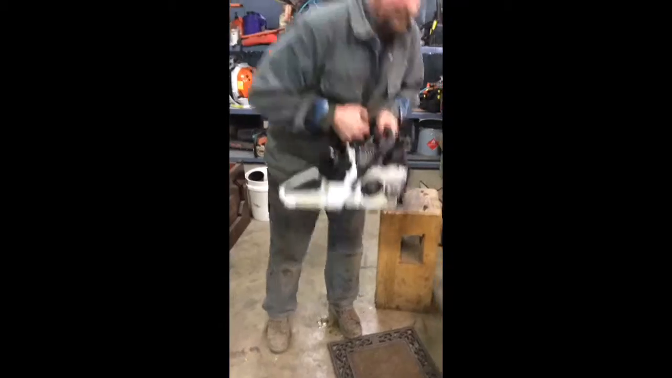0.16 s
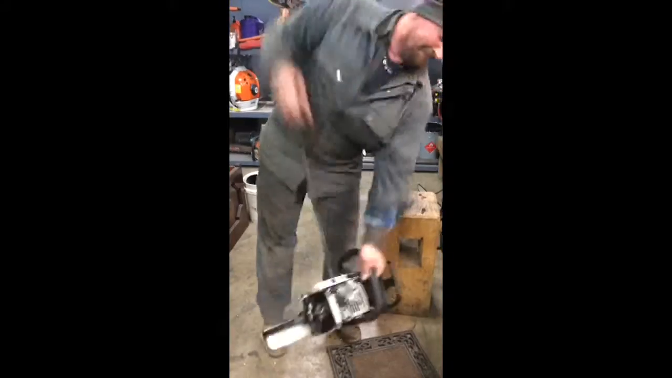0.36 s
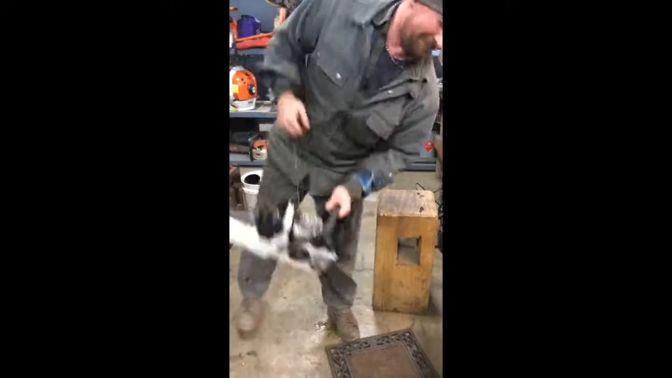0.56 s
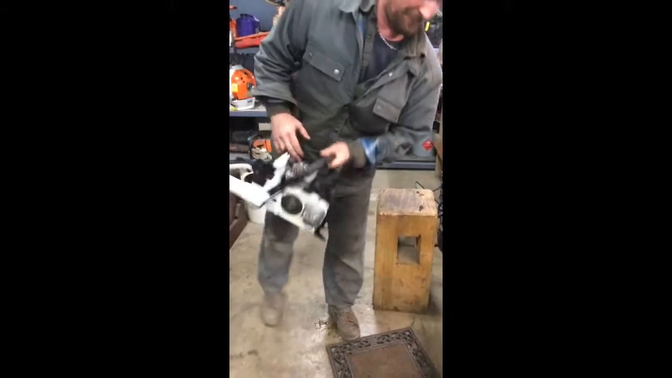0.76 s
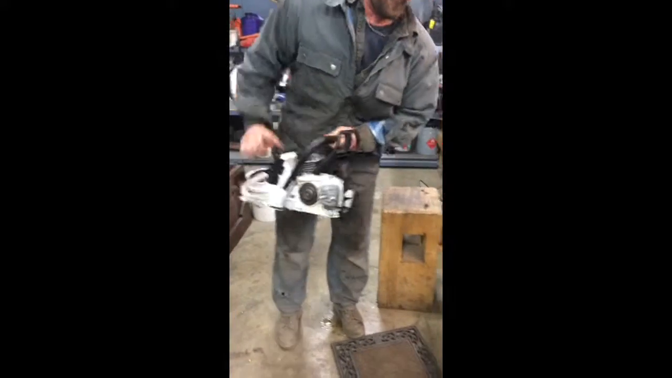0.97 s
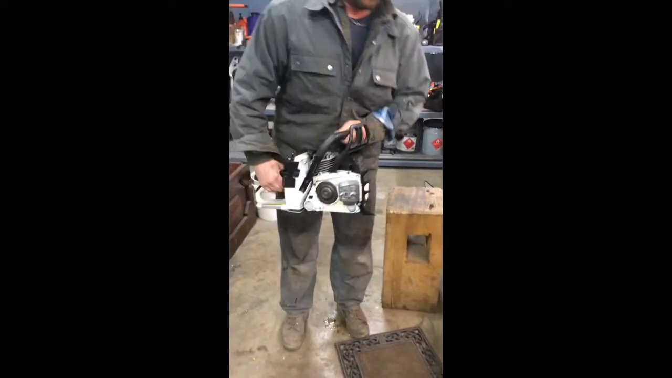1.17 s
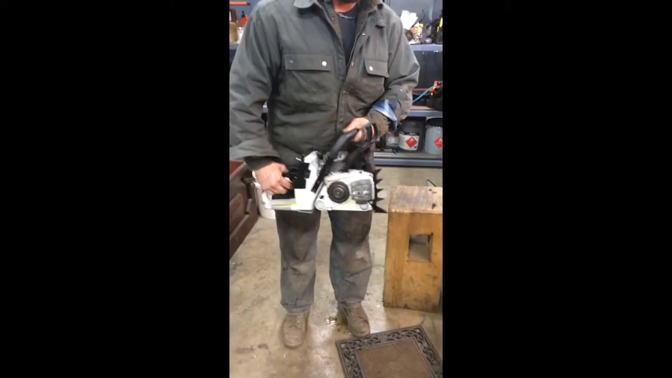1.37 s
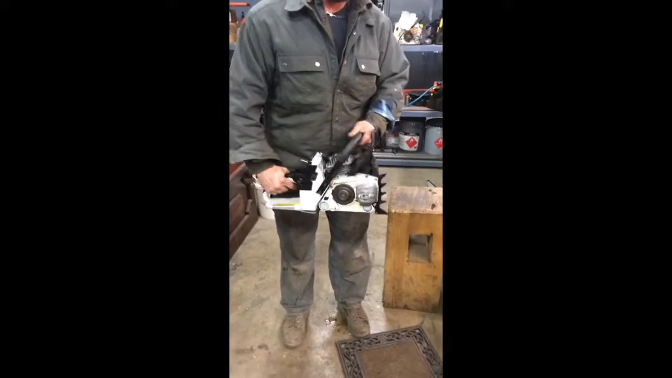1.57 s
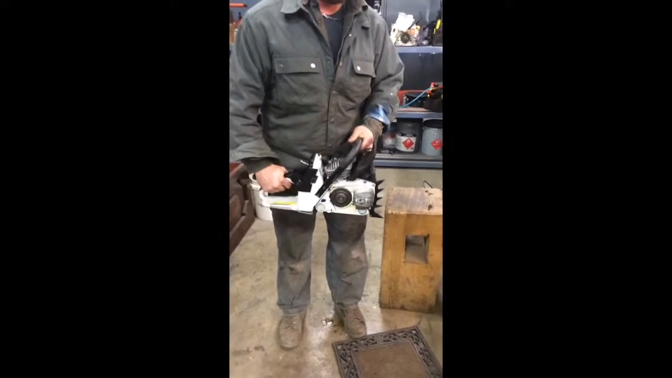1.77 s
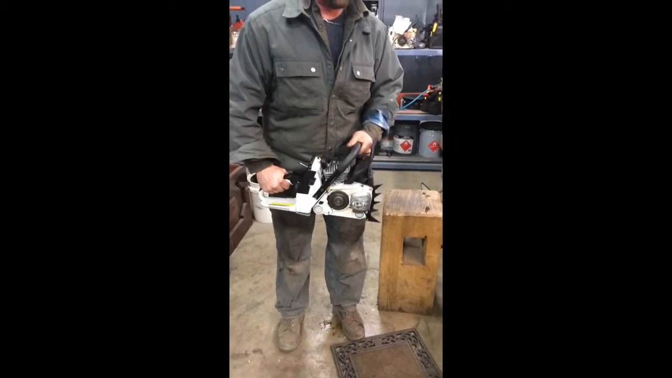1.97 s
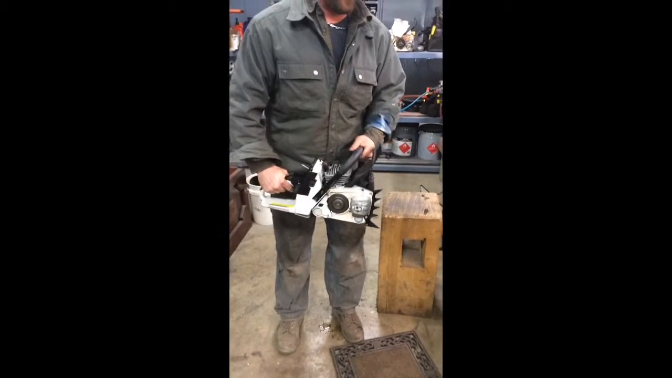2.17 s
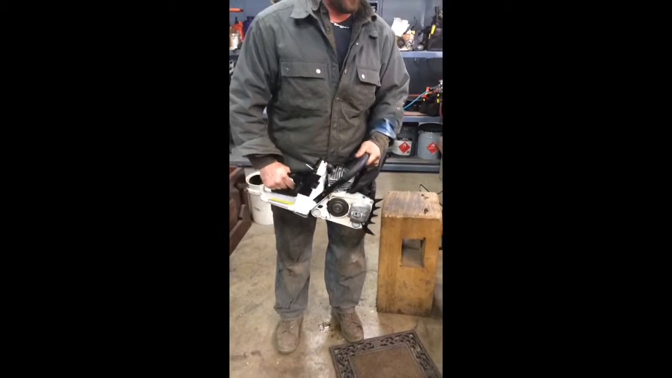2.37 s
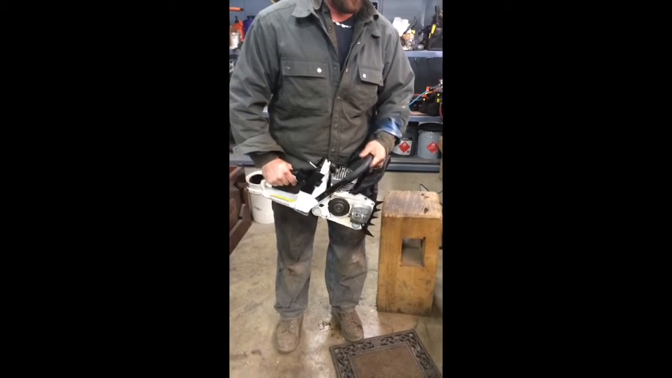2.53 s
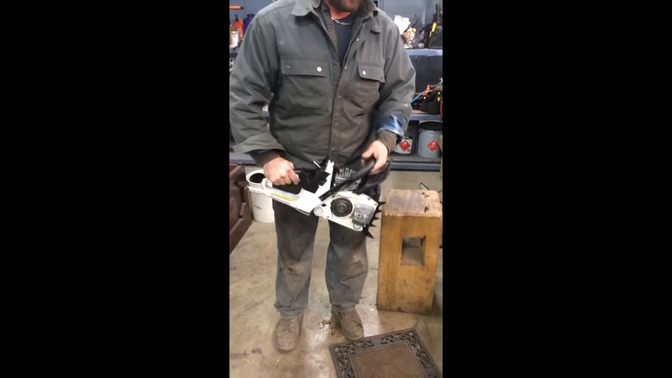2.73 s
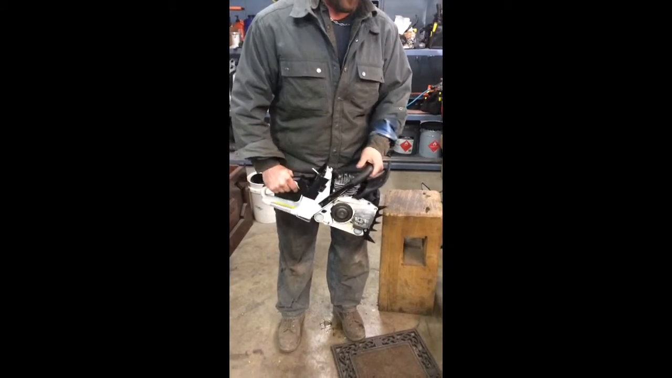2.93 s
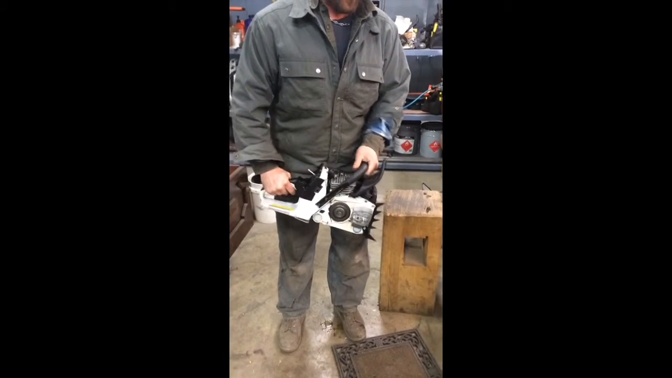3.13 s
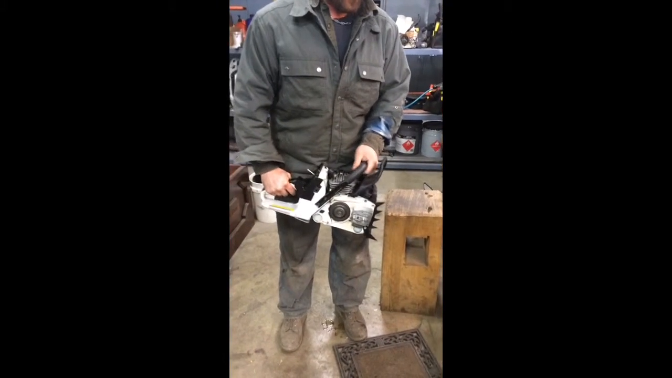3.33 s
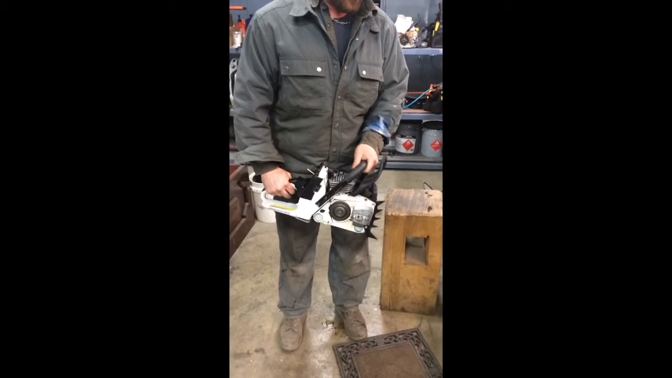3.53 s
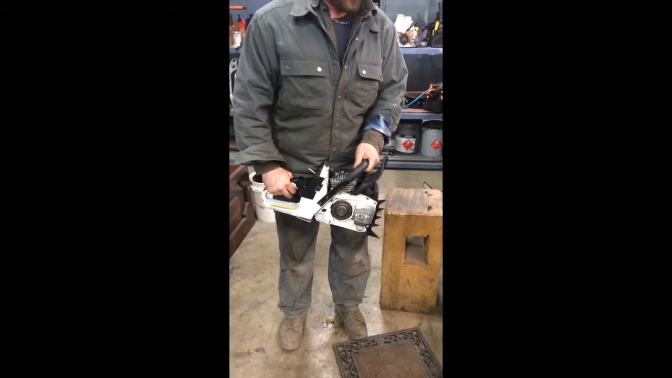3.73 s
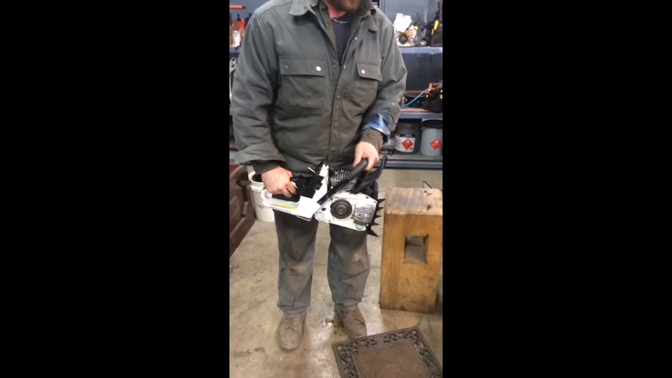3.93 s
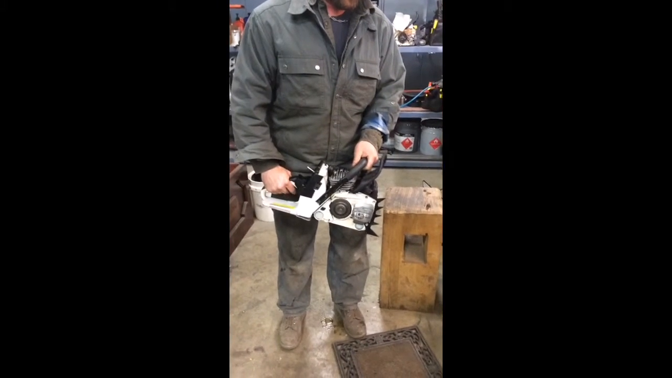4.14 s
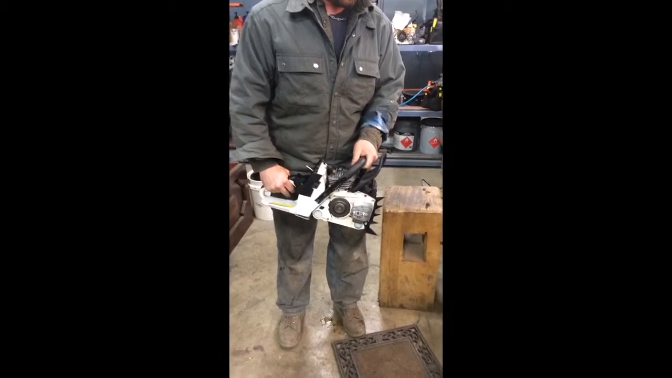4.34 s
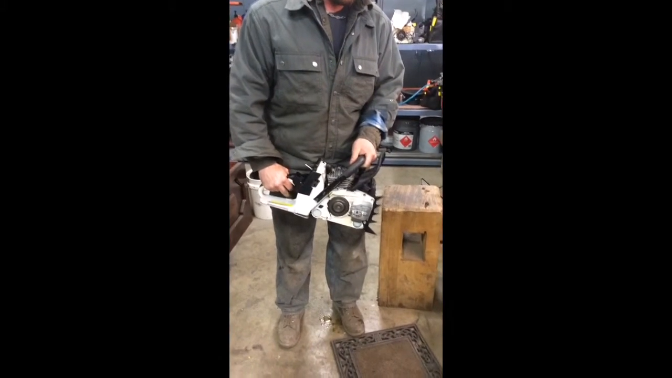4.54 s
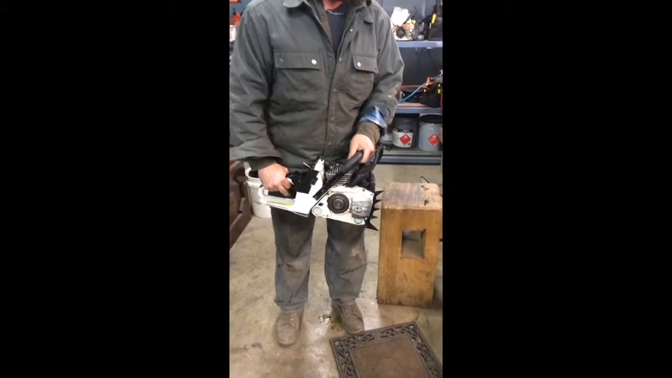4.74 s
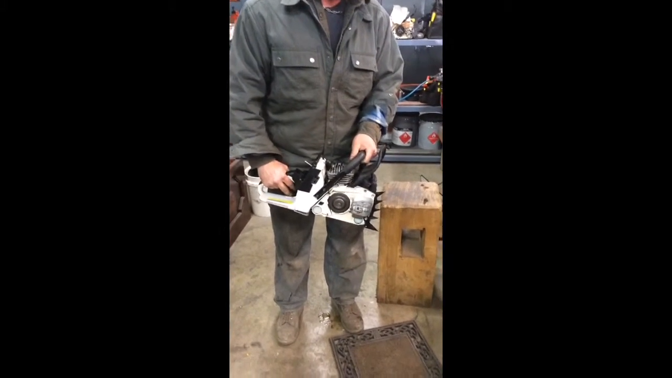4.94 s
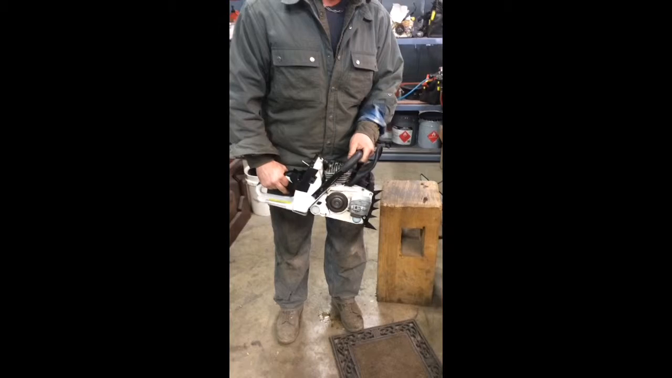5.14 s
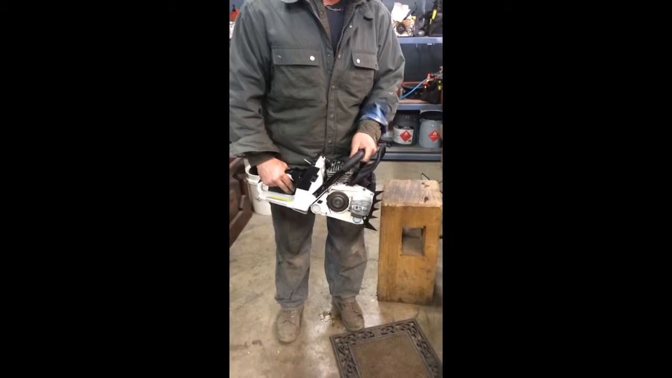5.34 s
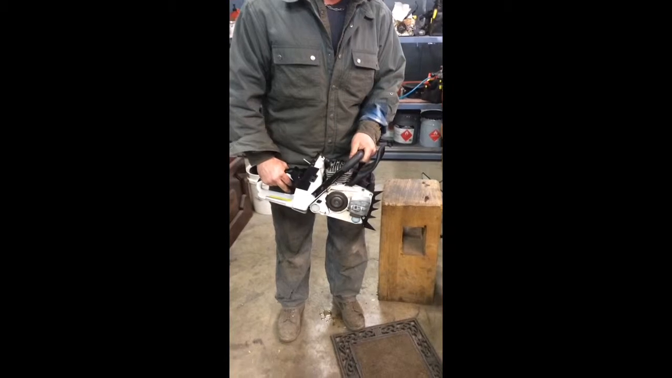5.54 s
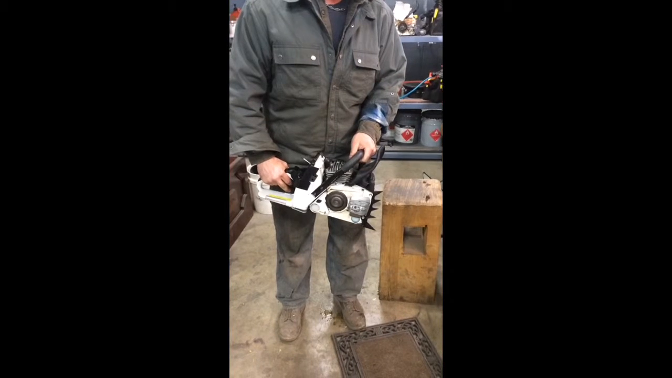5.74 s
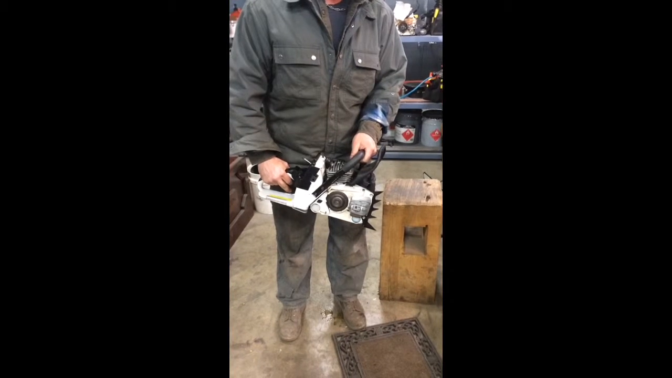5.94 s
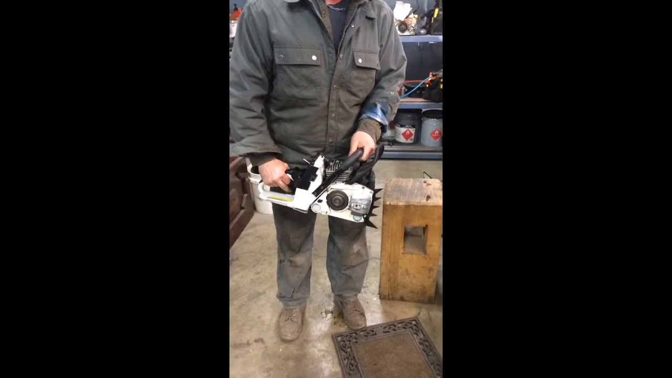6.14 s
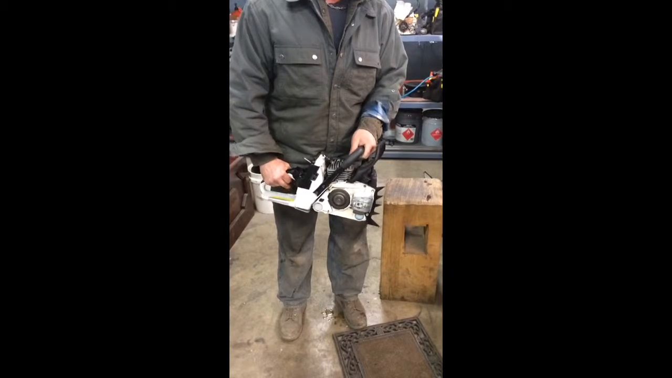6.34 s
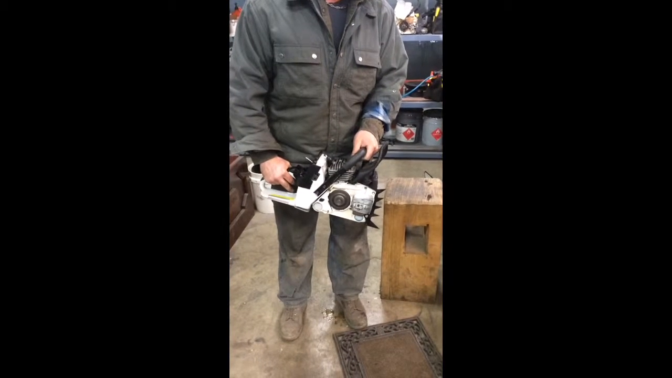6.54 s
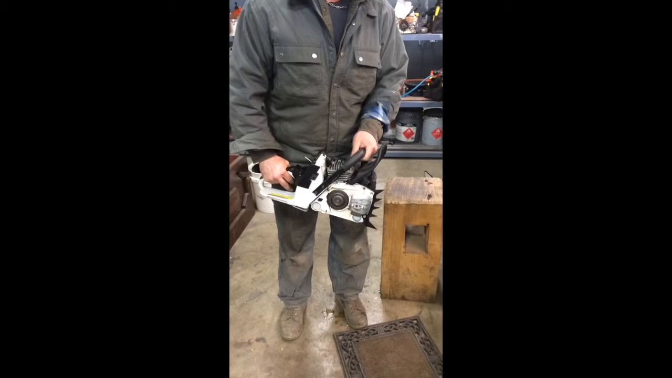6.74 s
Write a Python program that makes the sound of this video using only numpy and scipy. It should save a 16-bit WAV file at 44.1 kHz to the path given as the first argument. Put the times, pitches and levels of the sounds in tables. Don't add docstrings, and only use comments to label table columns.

```python
import sys
import numpy as np
from scipy import signal
from scipy.fft import rfft, irfft, next_fast_len
from scipy.io import wavfile
from scipy.ndimage import uniform_filter1d

SR = 44100
rng = np.random.default_rng(int(sys.argv[2]) if len(sys.argv) > 2 else 0)


def bounce(signal):
    frames = np.transpose(np.atleast_2d(signal))
    limited = np.clip(frames, -1, 1)
    pcm = np.round(limited * 32767).astype(np.int16)
    wavfile.write(sys.argv[1], SR, pcm)


def how_loud(loudness_db):
    steps = np.asarray(loudness_db, float) / 20
    return 10 ** steps


N = 299880


def unit(x):
    return x / np.sqrt(np.mean(x ** 2) + 1e-20)


def steady(x):
    power = np.abs(uniform_filter1d(x ** 2, size=SR // 10))
    return x / np.sqrt(power + 1e-3 * np.mean(x ** 2))


def along(points, hz):
    f, v = np.transpose(points)
    return np.interp(np.log(hz + 1), np.log(f + 1), v)


def filtered(x, response):
    m = 2 * next_fast_len((N + SR // 2) // 2)
    return irfft(rfft(x, m) * response(np.fft.rfftfreq(m, 1 / SR)), m)[:N]


def gain(points):
    return lambda hz: how_loud(along(points, hz))


def causal(points):
    def response(hz):
        cepstrum = irfft(np.log(how_loud(along(points, hz)) + 1e-6))
        half = len(cepstrum) // 2
        return np.exp(rfft(np.r_[cepstrum[0], 2 * cepstrum[1:half], np.zeros(half)]))
    return response


def modes(rows):
    def response(f):
        total = 0
        for k, (centre, width, db) in enumerate(rows):
            damping = 1j * f * width
            total = total + (-1) ** k * how_loud(db) * damping / (centre * centre - f * f + damping)
        return total
    return response


def no_bass(f, hz):
    return f ** 4 / (f ** 4 + hz ** 4)


def pulses(times, sizes):
    at = np.asarray(times)[:, None] * SR
    taps = np.floor(at) + np.arange(-7, 9)
    shape = np.sinc(taps - at) * np.cos(np.pi * (taps - at) / 17) ** 2
    heights = shape * np.asarray(sizes)[:, None]
    return np.bincount(np.clip(taps, 0, N).astype(int).ravel(), heights.ravel(), N + 1)[:N]


def bursts(train, t60, rise):
    swell = np.exp(-1 / (rise * SR))
    decay = how_loud(-60 / (t60 * SR))
    return signal.lfilter([1 - swell], np.convolve([1, -swell], [1, -decay]), train)


def wobble(rate):
    knots = rng.standard_normal(int(N * rate / SR) + 2)
    return np.interp(np.arange(N) * rate / SR, np.arange(len(knots)), knots)


def orders(rows, colour, speed, turns):
    total = np.zeros(N)
    for k, db in rows:
        flutter_db = 1.8 * wobble(14)
        level = how_loud(db + along(colour, k * speed) + flutter_db)
        total += level * np.sin(2 * np.pi * (k * turns + rng.random()))
    return total


# (t/s, peak level/dB, centre f/Hz, t60/s, click share)
CORD_CONTACTS = [
    (0.211, -44, 4000, 0.035, 6),
    (.233, -15, 1040, 0.043, 13),
    (0.339, -8, 1570, 0.12, 1),
    (0.342, -29, 7960, 0.4, 1),
    (.366, -9.5, 667, .12, 2.9),
    (0.379, -4.5, 2000, 0.15, 1.4),
    (.382, -19, 1040, 0.075, 2),
    (0.401, -4.5, 224, 0.053, 28),
]


def starter():
    out, t = np.zeros(N), np.arange(SR // 4) / SR
    spread = 1.59
    for s, db, hz, t60, click in CORD_CONTACTS:
        b, a = signal.butter(3, [hz / spread, hz * spread], "band", fs=SR)
        burst = signal.lfilter(b, a, rng.standard_normal(len(t)) + click * (t == 0))
        out[round(s * SR):][:len(t)] += how_loud(db - 11 - 60 * t / t60) * unit(burst)
    return out


# (t/s, speed/turns per s, rich mixture level/dB, clutch play level/dB)
IDLE = [(.4, 59.3, 0, 2), (.44, 59.3, 7.5, 4), (.52, 59, 4, 1), (.8, 53, 3.5, -2.5), (1, 48.2, 3, -1),
        (1.31, 46, 2, 0), (1.75, 44.8, 1.5, 2), (1.84, 47.3, -1, -1.5), (1.96, 41.8, 0.5, 0),
        (2.9, 39, 0.5, 0.5), (3.3, 41.4, -1, 4), (3.6, 38, 0, -1), (3.78, 40.5, 0.5, 3),
        (3.95, 38.5, -1.5, -2.5), (4.25, 38.5, 1, 2), (4.4, 40, -1.5, -4.5), (4.6, 36.3, 0, -4)]
# (pulled t/s, top reached t/s, top speed/turns per s, hang at top/s, coasting time constant/s)
TRIGGER_PULLS = [
    (1.789, 1.901, 91, .06, 1.5),
    (1.957, 2.089, 156.5, .028, 1.47),
    (4.648, 4.83, 131, .09, 1.5),
    (5.125, 5.302, 198, .002, 1.56),
    (6.092, 6.2, 153.5, .075, 1.5),
    (6.27, 6.42, 209.5, .008, 1.53),
]


def crank_speed(t):
    dry_friction = 70
    settle = 8
    speed = idle = np.interp(t, *np.transpose(IDLE)[:2])
    for pulled, reached, top, hang, coast_s in TRIGGER_PULLS:
        climb = np.interp(t, [pulled, reached], [np.interp(pulled, t, speed), top])
        slowing = np.exp(-np.clip(t - reached - hang, 0, None) / coast_s)
        coast = (top + dry_friction) * slowing - dry_friction
        landing = (np.clip(coast, 0, None) ** settle + idle ** settle) ** (1 / settle)
        speed = np.where(t < pulled, speed, np.where(t < reached, climb, landing))
    return uniform_filter1d(speed, size=SR // 40)


# (t/s, rattle peak level/dB, casing level/dB, thump level/dB)
KNOCKS = [(0.421, 8, 0, -31), (.459, 5, -7, -28), (0.607, 5, -29, -33), (.825, -3, -12, -33.5),
          (.953, -2, -14, -34), (1.073, -9, -16, -33), (1.196, -12, -12, -36), (1.237, -20.5, -12, -38),
          (1.390, -6, -34, -30), (1.506, -36, -7, -29), (1.591, -18, -20, -28.5), (1.812, -9, -31, -27),
          (3.040, -8, -13, -38), (3.077, -15, -19, -47), (3.117, -8, -34, -49), (3.244, -7, -11, -50),
          (3.291, -13, -4, -40), (3.470, -2, -16, -27.5), (3.516, -1, -31, -36), (3.652, -9, -2, -31),
          (3.766, -13, -3, -30), (3.836, -17, -18, -38), (3.938, -10, -11, -34), (4.022, -20, -18, -45),
          (4.106, -34, -8, -36), (4.193, -5, -2, -31), (4.464, -1, -3, -34), (4.490, -5, -14, -47),
          (4.616, 3, 3.5, -27), (4.658, 0, -10, -29)]


def crank():
    t, fired = np.arange(N) / SR, np.transpose(KNOCKS)[0]
    speed = crank_speed(t)
    turns = np.cumsum(speed) / SR
    slip = np.unwrap(np.interp(fired, t, turns) % 1, period=1)
    locked = np.maximum.accumulate(turns - np.interp(t, fired, slip))
    whole_turns = np.arange(np.ceil(locked[0]), locked[-1])
    return speed, turns, np.interp(whole_turns, locked, t)


# (speed/turns per s, muffler level/dB, roar level/dB, casing level/dB, clutch level/dB)
RELEASED = [(37.01, -27, -33, -20.5, -28.5), (48, -22.5, -27.5, -21.5, -23.5),
            (54.6, -25, -25, -22.5, -30.5), (70.65, -25.5, -27, -23.5, -36), (92, -29.5, -32, -23.5, -35),
            (110.46, -24, -35.5, -16, -30.5), (132.95, -17.5, -38, -16.5, -24.5),
            (154.5, -33, -28, -15, -23.5), (200.4, -21.5, -25.5, -14, -21)]
# (speed/turns per s, muffler level/dB, roar level/dB, casing level/dB, clutch level/dB)
PULLED = [(49.5, -20.5, -23, -19.5, -17.5), (77.6, -14.5, -14.5, -22.5, -21.5), (115, -33, -14, -16, -27),
          (141.67, -22, -20, -14.5, -24.5), (161.5, -15, -20.5, -15, -21), (197.3, -12, -23, -20, -25.5)]


def loudness(t, speed, throttle):
    def by_speed(rows):
        turns_per_s, *levels = np.transpose(rows)
        return np.array([np.interp(speed, turns_per_s, db) for db in levels])

    s, _, rich_db, play_db = np.transpose(IDLE)
    trigger_db = (1 - throttle) * by_speed(RELEASED) + throttle * by_speed(PULLED)
    gains = how_loud(trigger_db + np.interp(t, s, rich_db, left=-120))
    return *gains[:3], gains[3] * how_loud(np.interp(t, s, play_db, right=0))


# (f/Hz, level/dB)
MUFFLER = [(30, -92), (60, -8), (130, -25), (165, -1), (200, 0), (240, 1), (275, 1), (310, -26.5),
           (420, -15), (600, -45)]
# (multiple of shaft f, level/dB)
PUFF_ORDERS = [(1, -9), (2, -3.5), (3, -2.5), (4, 2.5), (5, -10), (6, -10)]
# (t/s, misfire share 0-1)
MISFIRES = [(.4, 1), (.62, .95), (.7, .25), (1.25, .35), (1.5, .6), (1.75, .65), (1.85, .12), (3.15, .14),
            (3.3, 1), (4.62, 1), (4.72, .1), (5.3, .04), (6.8, .04)]


def muffler_puffs(t, speed, turns, throttle, pumped):
    lumpy = np.interp(t, *np.transpose(MISFIRES))
    beat = 0.67 * throttle * np.clip(speed / 130, 0, 1) ** 2 * np.sin(2 * np.pi * turns)
    note = steady(orders(PUFF_ORDERS, MUFFLER, speed, turns) + beat)
    breathy = pumped + 0.12 * rng.standard_normal(N)
    return steady((1 - lumpy) * note + lumpy * steady(filtered(breathy, causal(MUFFLER))))


def firing_thump():
    fired, _, _, thump_db = np.transpose(KNOCKS)
    jolt = bursts(pulses(fired, how_loud(thump_db + 22)), 0.0047, 0.00051)
    thump = filtered(jolt, modes([(66.5, 74, 10), (130, 47, 5.5)]))
    outlet = causal([(60, -22), (300, 3.5), (580, -1.5), (720, -24), (2000, -44)])
    return thump + filtered(pulses(fired, how_loud(thump_db + 45.5)), outlet)


# (f/Hz, width/Hz, level/dB)
DRUM = [(6430, 46, -7), (6820, 85, -4), (8620, 69, -6), (9110, 40, -4), (9650, 28, -2), (9830, 67, 0),
        (11200, 45, -2), (11800, 130, -2), (12500, 110, -8), (13200, 56, -4), (14100, 83, -12),
        (14800, 120, -13)]


def drum(times, sizes):
    out = np.zeros(N)
    for hz, width, db in DRUM:
        pole = np.exp(-np.pi * width / SR)
        scatter = how_loud(4 * rng.standard_normal(len(times)))
        blows = bursts(pulses(times, sizes * scatter), 0.065, 0.00032)
        resonator = [1, -2 * pole * np.cos(2 * np.pi * hz / SR), pole ** 2]
        ring = signal.lfilter([1], resonator, blows * rng.standard_normal(N))
        out += how_loud(db) * np.sqrt(width) * unit(ring)
    return unit(out)


# (f/Hz, level/dB)
RATTLE = [(2350, 22.5), (4000, 12), (8080, 6), (9910, -5), (10700, 5), (13800, 1), (15500, -1)]


def clutch_rattle(times, idle, speed):
    fired, rattle_db, _, _ = np.transpose(KNOCKS)
    turn_slaps = (0.03 + idle) * how_loud(3 * rng.standard_normal(len(times)))
    slap_times = np.r_[times, fired]
    slap_sizes = np.r_[turn_slaps, how_loud(rattle_db + 8)]
    cover_echo = modes([(10700, 450, -0.3)])
    scrape = (0.15 + bursts(pulses(slap_times, slap_sizes), 0.05, 0.004)) * rng.standard_normal(N)
    hiss = unit(filtered(scrape, lambda f: gain(RATTLE)(f) * no_bass(f, 2000) * (1 - cover_echo(f))))
    bearing = unit(filtered(rng.standard_normal(N), modes([(10250, 300, 0)])))
    loose = np.clip((59 - speed) / 8, 0.05, 1)
    return steady(0.74 * loose * drum(slap_times, slap_sizes) + hiss + 0.053 * (1.4 - loose) * bearing)


def panels(drive, colour, rows):
    return steady(filtered(drive, lambda f: gain(colour)(f) * no_bass(f, 280) * (1 + modes(rows)(f))))


def outlet_whistle(throttle, speed):
    lag = np.exp(-1 / (0.04 * SR))
    heat = signal.lfilter([1 - lag], [1, -lag], throttle)
    flutter = unit(uniform_filter1d(rng.standard_normal(N), size=SR // 110))
    hz = 1900 + 800 * heat + 2 * speed
    return heat * flutter * np.sin(2 * np.pi * np.cumsum(hz) / SR)


# (f/Hz, level/dB)
CASING = [(180, -109), (300, -14), (696, -36), (1110, -14), (1640, -12), (2100, 1.5), (2690, -9),
          (2980, -2), (8990, -46.5), (10300, -20), (15500, -73)]
OPEN_CASING = [(530, -8), (900, 4), (1380, -4.5), (1870, 5), (2600, 4.5), (2920, -3.5), (3570, -1),
               (9000, -16), (11700, -54), (19800, -120)]
# (f/Hz, width/Hz, level/dB)
IDLE_PANELS = [(457, 32, 11), (1135, 5, 22), (1430, 290, 2.5), (2050, 43, 9.5), (2337, 120, 5.5),
               (3286, 41, 12.5), (4570, 660, 8.5)]
COAST_PANELS = [(1124, 34, 12.15), (2038, 37, 11.4), (2256, 52, 1.33), (2975, 62.7, 7.7), (3920, 21.7, 7.1)]
OPEN_PANELS = [(1109, 20, 10.4), (2947, 24, 14)]
# (multiple of shaft f, level/dB)
FIN_ORDERS = [(6, 0), (7, 0), (8, -6), (12, -9), (13, -5), (14, -9)]
# (f/Hz, level/dB)
FINS = [(600, -3), (900, 9.5), (1150, 6.5), (1500, 4), (1800, -2), (2100, -22.5), (2500, -6), (3000, -1)]


def casing_noise(times, idle, speed, turns, throttle):
    fired, _, casing_db, _ = np.transpose(KNOCKS)
    chance = rng.standard_normal(len(times))
    knocks = pulses(times, (0.82 + 0.77 * idle) * how_loud(2.2 * chance)) + pulses(fired, how_loud(casing_db + 12))
    shake = steady((0.31 + bursts(knocks, 0.012, 0.0022)) * rng.standard_normal(N))
    blows = shake + 1.2 * steady(pulses(times, how_loud(1.2 * chance)))
    fin_level = 0.27 * np.clip((speed - 125) / 40, 0, 1)
    fins = fin_level * steady(orders(FIN_ORDERS, FINS, speed, turns))
    pulled = panels(blows, OPEN_CASING, OPEN_PANELS)
    coasting = panels(blows, CASING, COAST_PANELS) + fins
    running = np.sqrt(throttle) * pulled + np.sqrt(1 - throttle) * coasting
    fan = unit(filtered(rng.standard_normal(N), modes([(3910, 460, 0)])))
    running = running + 0.5 * (speed / 200) ** 2 * fan + 0.95 * outlet_whistle(throttle, speed)
    fast = np.clip((speed - 62) / 25, 0, 1)
    return np.sqrt(1 - fast) * panels(shake, CASING, IDLE_PANELS) + np.sqrt(fast) * running


# (f/Hz, level/dB)
COVER = [(60, -82), (250, -22.5), (330, 2), (450, 4), (600, 0.5), (720, -8.5), (900, -5), (1100, -3.5),
         (1400, -15.5)]
# (multiple of shaft f, level/dB)
SHAFT_ORDERS = [(2, -1.5), (3, -5), (4, -4.5), (5, -0.5), (6, 8), (7, -9.5), (8, 5.5), (9, -11), (10, -27)]


def coasting_whirr(speed, turns, gas):
    whirr = steady(filtered(gas + 0.91 * rng.standard_normal(N), gain(COVER)))
    lines = steady(orders(SHAFT_ORDERS, COVER, speed, turns)) * np.clip((speed - 55) / 60, 0.1, 1)
    return 1.3 * lines + 0.68 * whirr


# (f/Hz, level/dB)
THROAT = [(40, -41), (90, -6.5), (160, 0), (330, -7), (500, -0.5), (620, -1), (750, -2.5), (930, -3),
          (1150, -13), (2500, -23)]
# (multiple of shaft f, level/dB)
PULL_ORDERS = [(1, -6), (2, 1), (3, 1), (4, -1), (5, -4), (6, -6), (7, -7)]


def throttle_roar(speed, turns, turn, gas):
    growl = steady(filtered(turn + 0.9 * gas + 0.5 * rng.standard_normal(N), causal(THROAT)))
    return steady(growl + 0.62 * steady(orders(PULL_ORDERS, THROAT, speed, turns)))


def engine():
    t = np.arange(N) / SR
    speed, turns, times = crank()
    gaining = uniform_filter1d(np.gradient(speed) * SR, size=SR // 30)
    throttle = np.clip(gaining / 260, 0, 1)
    muffler, roar, casing, clutch = loudness(t, speed, throttle)
    idle = np.clip((72 - np.interp(times, t, speed)) / 20, 0, 1)

    late, fired_chance, pumped_chance = rng.standard_normal((3, len(times)))
    turn = unit(pulses(times + 0.0011 * idle * late, how_loud((1 + 1.2 * idle) * fired_chance)))
    pumped = unit(pulses(times + 0.0012 * idle * late, how_loud((1.6 + 3.5 * idle) * pumped_chance)))
    gas = unit(bursts(turn, 0.0037, 0.00049) * rng.standard_normal(N))

    puffs = muffler * muffler_puffs(t, speed, turns, throttle, pumped)
    rattle = how_loud(1.5) * clutch * clutch_rattle(times, idle, speed)
    shake = casing * casing_noise(times, idle, speed, turns, throttle)
    coast = (1 - throttle) * coasting_whirr(speed, turns, gas)
    growl = throttle * throttle_roar(speed, turns, turn, gas)
    return puffs + firing_thump() + rattle + shake + roar * (coast + growl)


# (f/Hz, t60/s)
SHOP = [(200, 0.47), (2000, 0.11), (10000, 0.18)]


def shop(x):
    hz, t, z = signal.stft(rng.standard_normal(SR // 2), SR, nperseg=256)
    decay = how_loud(-60 * t / along(SHOP, hz)[:, None])
    tail = signal.istft(z * decay, SR, nperseg=256)[1]
    return signal.fftconvolve(np.pad(x, (300, 0)), tail / np.linalg.norm(tail))[:N]


# (f/Hz, level/dB)
SHOP_AIR = [(15, -60), (25, -36), (40, -21), (66, -8), (83, -17), (93, -6), (271, -14), (879, -22.5),
            (1630, -18.5), (15000, -51.5)]


def scene():
    saw = starter() + engine()
    air = how_loud(-49) * unit(filtered(rng.standard_normal(N), gain(SHOP_AIR)))
    return np.tile(how_loud(-1) * saw + how_loud(-9.5) * shop(saw) + air, (2, 1))


def low_pass(x):
    return signal.sosfilt(signal.butter(12, 15730, fs=SR, output="sos"), x)


# (f/Hz, level/dB)
MICROPHONE = [(25, -14), (65, 0), (13700, 0), (14300, -4), (15300, -8), (15700, -30)]


def record(dry):
    heard = np.array([filtered(side, gain(MICROPHONE)) for side in dry])
    ceiling = 0.8
    mix = heard / (1 + np.abs(heard / ceiling) ** 4) ** (1 / 4)
    return low_pass(mix)


dry = scene()
out = record(dry)
bounce(out)
```